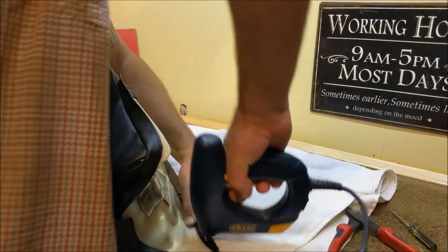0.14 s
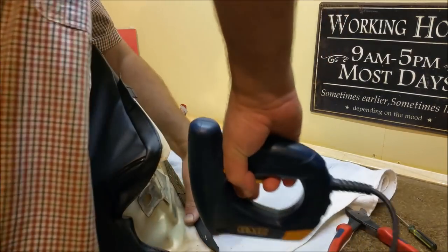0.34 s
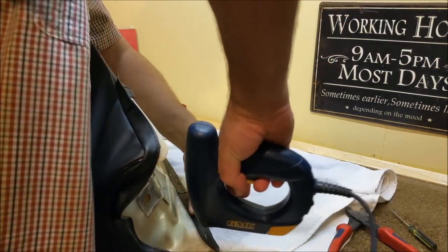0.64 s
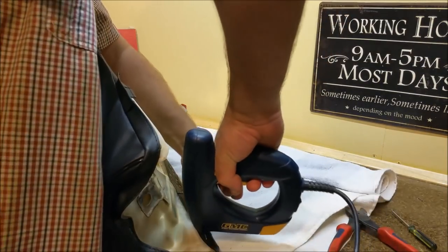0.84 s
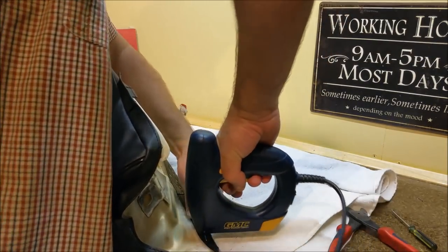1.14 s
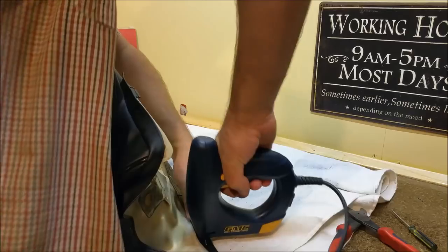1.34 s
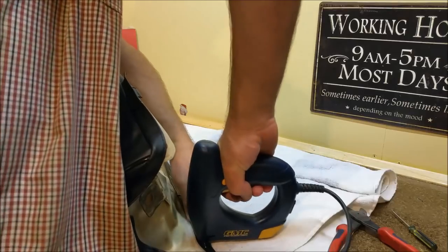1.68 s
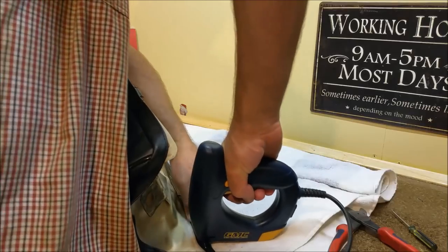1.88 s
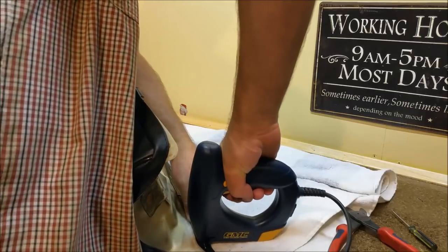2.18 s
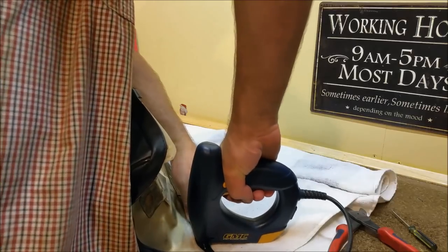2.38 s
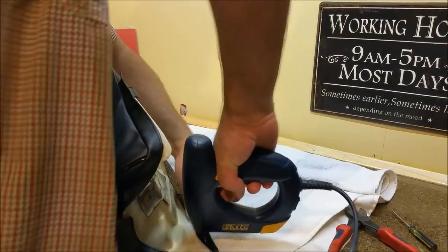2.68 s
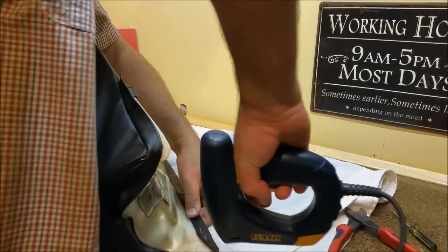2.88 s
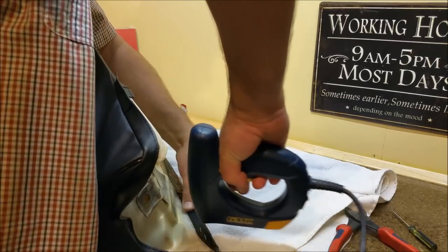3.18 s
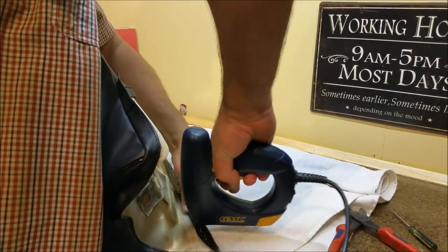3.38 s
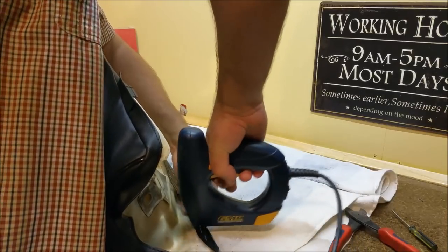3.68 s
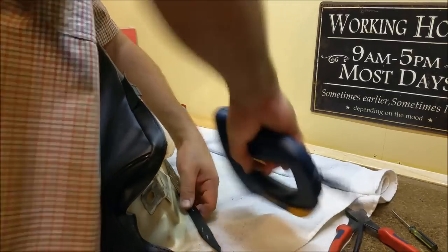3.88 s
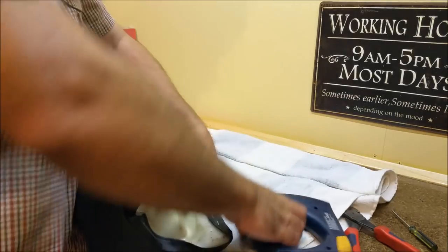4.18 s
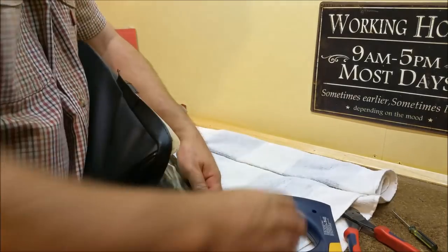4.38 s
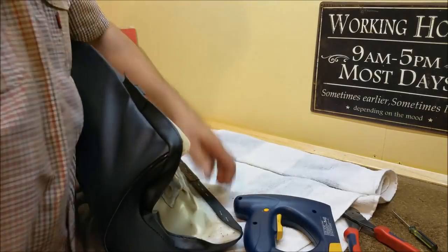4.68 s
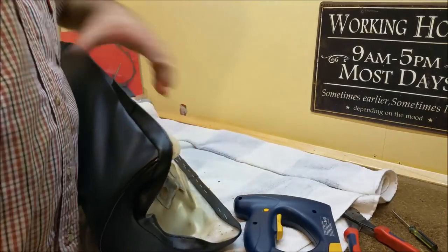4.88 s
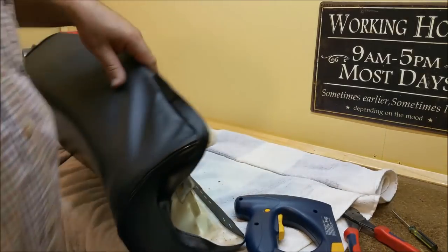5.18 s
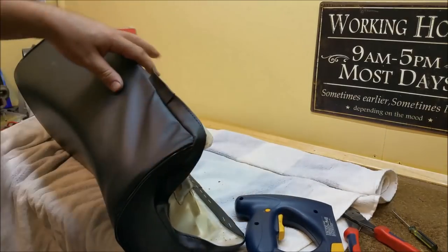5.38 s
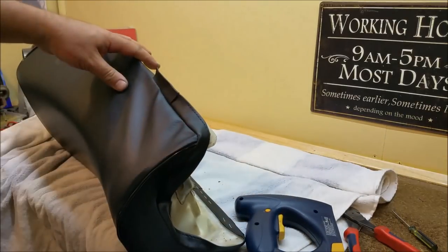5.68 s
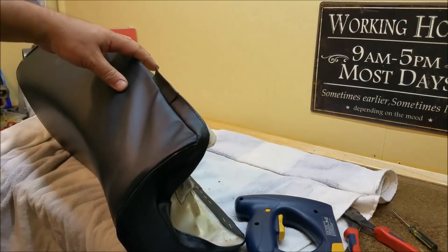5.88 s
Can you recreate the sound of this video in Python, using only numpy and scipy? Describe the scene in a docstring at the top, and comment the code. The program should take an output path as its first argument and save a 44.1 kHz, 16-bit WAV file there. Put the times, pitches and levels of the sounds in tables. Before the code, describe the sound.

A small workshop heard close up in stereo, with short room echo. Faint rumble, hiss and cloth rub open the scene; a thin, high cricket trill near 3.7 kHz, pulsing about 27 times a second in bouts with slower starts, is low at first and rises after 1.1 s. Stiff vinyl gives dry little snaps around 1.5 to 2.3 s with rustling. At 2.36 s an electric staple gun fires once: a very loud, hard burst of several blows within 20 ms, with housing ring and room tail. Trill and background drop from 2.5 s, recovering after 3.6 s. Around 4 s the tool brushes a towel, a crease cracks at 4.15, then ticks, hollow clacks and low thumps tumble from 4.19 to 4.45 s. Seat rumble and rustle follow, a soft pat at 5.1 s, light creases near 5.7 s, and a faint low hum grows under the trill until 6 s.

```python
"""First the rustle of vinyl and shirt as a padded seat is handled, over a faint workshop background.
A thin high trill, most likely a cricket, sings in bouts of falling notes, smeared by the room.
An electric staple gun fires once into the vinyl: a burst of blows makes its housing and the room ring.
It is laid on the padded bench and rocks to rest in ticks, clacks and thumps; later a hand pats the seat.
Trill and background start low, come up, and dip again for about a second after the shot."""
import sys
import numpy as np
from scipy import signal
from scipy.fft import rfft, irfft, next_fast_len
from scipy.io import wavfile
from scipy.ndimage import uniform_filter1d

SR = 44100
rng = np.random.default_rng(int(sys.argv[2]) if len(sys.argv) > 2 else 0)


def wrap_up_sound(samples):
    """Save the sound to the file named by the first command line argument, as 16-bit audio."""
    columns = np.atleast_2d(samples).T
    # keep every value between -1 and 1, then stretch to whole-number steps
    tamed = np.clip(columns, -1, 1)
    steps = np.round(tamed * 32767).astype(np.int16)
    wavfile.write(sys.argv[1], SR, steps)


N = 266792
T = np.arange(N) / SR  # time of every sample [s]


def undb(db):
    """Turn decibels into a plain gain."""
    return 10 ** (np.asarray(db) / 20)


def unit(x):
    """Scale a sound to an rms of 1."""
    return x / np.sqrt(np.mean(x ** 2))


def over_pitch(hz, points):
    """Read values off a curve of (frequency [Hz], value) points, on a log-frequency axis."""
    f, value = np.transpose(points)
    return np.interp(np.log(hz + 1), np.log(f), value)


def colour(x, points):
    """Give a sound the tone of a (frequency [Hz], level [dB]) curve, by a filter of unit power."""
    size = next_fast_len(N + SR // 2, True)
    size += size % 2
    gains = unit(undb(over_pitch(np.fft.rfftfreq(size, 1 / SR), points)))
    # folding the cepstrum forward makes the filter respond only after its input
    cepstrum = irfft(np.log(gains))
    cepstrum[1:size // 2] *= 2
    cepstrum[size // 2 + 1:] = 0
    response = np.exp(rfft(cepstrum))
    return irfft(rfft(x, size) * response)[..., :N]


def noise(side_db):
    """Stereo noise; side_db sets the left-right difference against the shared part."""
    mid, side = rng.standard_normal((2, N))
    return unit(mid + undb(side_db) * side * np.array([[1], [-1]]))


def walk(rate):
    """A smooth random wander with an rms of 1, given about rate new values per second."""
    k = int(SR / rate)
    steps = np.repeat(rng.standard_normal(N // k + 1), k)
    return unit(uniform_filter1d(steps, k)[:N])


def fade(start, length):
    """A sudden onset that falls to 1/e in length seconds."""
    return (T >= start) * np.exp(-np.clip((T - start) / length, 0, 60))


def swell(peak, rise, fall):
    """A smooth push that builds to a peak, then dies away."""
    before, after = ((T - peak) / rise) ** 2 / 2, (T - peak) / fall
    return np.exp(-np.where(T < peak, before, after).clip(0, 60))


def add(track, start, sound):
    """Mix a short sound into a track."""
    i = int(start * SR)
    track[..., i:i + sound.shape[-1]] += sound[..., :N - i]


def narrow(x, side_db):
    """Change the level of the difference between the channels."""
    mid = x.mean(axis=0)
    return mid + undb(side_db) * (x - mid)


# how long the workshop echoes before any stretch: (frequency [Hz], time to fall 60 dB [s])
ROOM_DECAY = [(60, 0.45), (300, 0.43), (900, 0.25), (2700, 0.33), (6000, 0.24), (14000, 0.16)]


def room(x, gap=0.006, stretch=0.98):
    """Diffuse echo of unit power: noise that starts after gap seconds, each octave dying at its own rate."""
    t = T[:int(.7 * SR)]
    spectrum = rfft(rng.standard_normal((2, len(t))))
    f = np.fft.rfftfreq(len(t), 1 / SR)
    tail = 0
    for hz in np.geomspace(32, 16384, 10):
        octave = np.clip(1 - abs(np.log2((f + 1) / hz)), 0, 1)
        band = irfft(spectrum * octave, len(t))
        t60 = stretch * over_pitch(hz, ROOM_DECAY)
        tail = tail + band * np.exp(-np.log(1000) * t / t60)
    tail = unit(tail * (t > gap)) / np.sqrt(len(t))
    return signal.fftconvolve(np.atleast_2d(x), tail, axes=1)[:, :N]


# tone of the low rumble: (frequency [Hz], relative level per Hz [dB])
RUMBLE_TONE = [(12, -37), (20, -10.5), (49, 3.5), (75, -0.5), (165, -0.5), (206, -3.5), (241, -2),
               (361, -10), (450, -15.5), (580, -38.5), (990, -120)]
# tone of rubbing cloth and of the dull wash: (frequency [Hz], relative level per Hz [dB])
RUB_TONE = [(200, -15), (450, 5), (800, -2.5), (1500, -6), (2600, -10.5), (4000, -11.5), (7000, -34.5)]
# tone of hiss, also used for crisp snaps: (frequency [Hz], relative level per Hz [dB])
HISS_TONE = [(1500, -10), (3000, 1), (4800, 2), (7000, -7.5), (10000, -4.5), (15000, -10)]
# steady background levels before the dips [dB]
RUMBLE_DB, WASH_DB, HISS_DB = -60, -67, -65.5
# the hum: starting pitch and level, then how much it grows [dB], from when [s] and over how long [s]
HUM_HZ, HUM_DB, HUM_GROWTH_DB, HUM_GROWS_S, HUM_GROWTH_S = 219, -72.5, 12, 4.53, 1.08


def workshop():
    """Steady filtered noise gives rumble, wash and hiss; a slightly wavering sine hums and grows late on."""
    growth = np.clip((T - HUM_GROWS_S) / HUM_GROWTH_S, 0, 1)
    hum_db = HUM_DB + HUM_GROWTH_DB * growth + 1.5 * walk(rate=3)
    hum_phase = 2 * np.pi * np.cumsum(HUM_HZ + 3 * walk(24)) / SR
    hum = np.sqrt(2) * np.sin(hum_phase) * undb(hum_db)
    rumble = undb(RUMBLE_DB) * colour(noise(side_db=-12.5), RUMBLE_TONE)
    wash = undb(WASH_DB) * colour(noise(side_db=-1.5), RUB_TONE)
    hiss = undb(HISS_DB) * colour(noise(side_db=2.5), HISS_TONE)
    return hum + rumble + wash + hiss


# when trill and background drop: (start [s], end [s], recovery to 1/e [s])
DIPS = [(-1, 1.056, 0.27), (2.5, 3.585, 0.23)]
DIP_DB = -15


def dips():
    """Level of the trill and background: a sudden drop, a hold and a gradual return."""
    depth = sum((T >= start) * np.exp(-np.maximum(T - end, 0) / recovery) for start, end, recovery in DIPS)
    return undb(DIP_DB * depth)


# tone of the steady workshop air: (frequency [Hz], relative level per Hz [dB])
AIR_TONE = [(20, -22.5), (33, -16), (50, 5.5), (110, -4.5), (250, -14.5), (500, -21.5), (1000, -20.5),
            (3000, -29.5), (6000, -33.5), (15000, -34)]
AIR_DB = -77


def air():
    """Faint, even noise of the workshop air."""
    return undb(AIR_DB) * colour(noise(side_db=-10.5), AIR_TONE)


# hand movements on the seat:
# (peak [s], rise [s], fall [s], rubbing level [dB], hiss level [dB], rumble level [dB])
MOVES = [(0.039, 0.19, 0.03, -56.5, -79.5, -55.5), (.2, 0.28, 0.23, -69, -86, -64.5),
         (1.1, 0.1, 0.2, -70, -96, -78.5), (1.54, 0.14, 0.39, -61, -66.5, -63),
         (2.64, 0.038, 0.19, -64, -79, -60), (3.1, 0.059, 0.41, -75.5, -97, -102),
         (4.53, 0.3, 0.3, -59, -66, -50), (5.02, .25, 0.11, -73.5, -65, -84),
         (5.62, 0.32, 0.42, -61, -60, -61.5)]
# the stapler brushing over the towel: (peak [s], rise [s], fall [s], level [dB])
BRUSHES = [(3.992, 0.021, 0.083, -53.5), (4.11, 0.02, 0.06, -54.5)]


def handling():
    """Cloth rubs in tiny slips and the seat rumbles on the bench; the stapler brushes the towel."""
    rub, hiss, rumble = sum(undb(levels)[:, None] * swell(peak, rise, fall)
                            for peak, rise, fall, *levels in MOVES)
    brush = sum(undb(db) * swell(peak, rise, fall) for peak, rise, fall, db in BRUSHES)
    # slow and fast wanders in level make the slips uneven
    slips = unit(undb(2 * walk(40) + 1.1 * walk(600)))
    # (frequency [Hz], relative level per Hz [dB])
    towel_tone = [(150, -15), (450, -3.0), (800, -8.5), (1550, 0.5), (2200, -18), (6000, -28.5)]
    towel = colour(noise(side_db=-2.5), towel_tone)
    return (rumble * colour(noise(side_db=-12.5), RUMBLE_TONE)
            + rub * colour(slips * noise(side_db=-1.5), RUB_TONE)
            + hiss * colour(slips * noise(side_db=-0.5), HISS_TONE)
            + brush * towel)


# bouts of trilling: (start [s], end [s])
BOUTS = [(-.3, .05), (.298, .40), (.598, 1.14), (1.308, 3.35), (3.54, 5.71), (5.85, 6.1)]
# wing strokes are slow and louder while a bout warms up, then fast; rates are averages per second
WARM_UP_S, WARM_UP_DB, SLOW_PER_S, FAST_PER_S = .21, 2, 16, 26.75
# one wing stroke: its force rises, holds and dies [s]
STROKE_ATTACK_S, STROKE_HOLD_S, STROKE_RELEASE_S = .007, .008, .017
# its pitch holds, then sags at an average speed down to an average limit
SAG_AFTER_S, SAG_HZ_PER_S, SAG_LIMIT_HZ = .012, 30000, 350
TRILL_DB, TRILL_ECHO_DB = -38.5, -5  # whole trill before the dips; echo against the direct song


def cricket(top_hz=3745, flutter_hz=26):
    """Each wing stroke sings a falling note; slow first strokes lead into a settled trill."""
    age, warming = np.ones(N), np.zeros(N)  # age: seconds since the stroke began; 1 is silent
    for start, end in BOUTS:
        on = (T >= start) & (T < end)
        warming[on] = T[on] - start < WARM_UP_S
        rate = np.where(warming[on], SLOW_PER_S, FAST_PER_S) * (1 + .01 * walk(30)[on])
        age[on] = np.cumsum(rate) / SR % 1 / rate
    corners = np.cumsum([0, STROKE_ATTACK_S, STROKE_HOLD_S, STROKE_RELEASE_S])
    force = np.interp(age, corners, [0, 1, 1, 0])
    push = uniform_filter1d(force, size=40) * undb(1.6 * walk(30) + WARM_UP_DB * warming)
    # the wing's scraper slows late in each stroke, by a randomly varying amount
    sag = np.clip(SAG_HZ_PER_S * (age - SAG_AFTER_S), 0, SAG_LIMIT_HZ) * (1 + 0.11 * walk(25))
    phase = 2 * np.pi * np.cumsum(top_hz - sag + flutter_hz * walk(250)) / SR
    overtones = (undb(-36) * np.sin(2 * phase) + undb(-33.5) * np.sin(3 * phase)
                 + undb(-35.5) * np.sin(4 * phase))
    # harder strokes sound brighter
    song = push * (np.sin(phase) + np.sqrt(abs(push)) * overtones)
    # the left channel gets it 5 samples later and slightly louder
    direct = np.array([undb(1) * np.roll(song, 5), song])
    echo = undb(TRILL_ECHO_DB) * room(song, gap=0.0046, stretch=1.1)
    return unit(direct + echo) * undb(TRILL_DB)


# vinyl creases snapping:
# (time [s], body level [dB], body pitch [Hz], relative treble level [dB])
CREASES = [(0.065, -49.5, 700, -74), (1.5137, -35, 2470, -41), (1.552, -48.5, 2300, -70),
           (1.607, -49, 2400, -72), (1.739, -36, 1830, -60), (1.793, -62, 1997, -46), (2.03, -41, 640, -75),
           (2.117, -48, 2200, -46), (2.206, -52, 2205, -47.5), (2.293, -47, 2433, -52.5),
           (4.065, -47, 1604, -46), (4.152, -34, 790, -46), (5.643, -49, 2340, -42),
           (5.739, -44, 2730, -61)]


def creases():
    """Folds of stiff vinyl give way with small dry snaps, each with a broad pitch of its own."""
    dry, grit = np.zeros((2, N)), noise(side_db=-4.5)
    for start, db, hz, _ in CREASES:
        band = signal.butter(2, [hz / 1.7, hz * 1.5], "bandpass", fs=SR)
        body = unit(signal.lfilter(*band, grit))
        dry += undb(db) * body * fade(start, 0.0027)
    crisp = sum(undb(db) * fade(start, 0.002) for start, _, _, db in CREASES)
    dry += undb(-5.0) * colour(crisp * noise(side_db=-1.5), HISS_TONE)
    return dry + undb(-10.0) * room(dry)


# blows inside the stapler:
# (time [s], relative level [dB], contact cut-off [Hz], fall to 1/e [s])
BLOWS = [(2.361, -15, 710, 0.0064), (2.3636, -2, 15900, 0.0058), (2.3668, -9, 2960, 0.0049),
         (2.374, 1.5, 1000, 0.0017), (2.3782, -6.5, 3500, 0.0015)]
# ringing of the stapler housing and driver:
# (frequency [Hz], relative level [dB], time to fall 60 dB [s])
GUN_MODES = [(146, -13, .25), (392, -3, .11), (428, -4, .15), (587, -3, .16), (763, 1, .2), (909, -5, .14),
             (1080, -7, .16), (1190, -3, .18), (1304, -1, .18), (1417, -4, .15), (1574, -3, .16),
             (1735, -4, .15), (2000, -8, .22), (2326, -9, .22), (2378, -5, .25), (2734, -12, .22),
             (3220, -11, .18), (4170, -11, .18), (4800, -12, .15)]
# tone of the snap: (frequency [Hz], relative level per Hz [dB])
SNAP_TONE = [(40, -21), (120, -5.5), (240, -10.5), (420, -2), (660, -8), (780, 0.5), (950, -7.5), (1400, 1),
             (2000, -7), (4000, -9.5), (5500, -14.5), (7500, -21.5), (12300, -17.5), (16000, -21)]
# tone sent into the snap's echo: (frequency [Hz], relative level per Hz [dB])
SNAP_ECHO_TONE = [(40, -34.5), (80, -21), (145, -11), (260, -7.5), (660, -3.5), (780, -5.5), (950, -7.5),
                  (1400, -2), (2400, -4.5), (3000, -10), (4800, -8.5), (6300, -13.5), (11500, -18),
                  (16000, -28.5)]
SNAP_DB, HOUSING_DB, RECOIL_DB, SNAP_ECHO_DB = 4.0, -24.5, -21, -7  # gains of the four parts


def staple_shot(recoil_hz=80, recoil_s=.0035):
    """The solenoid throws the driver, which strikes, rattles and springs back; housing and room ring."""
    force, strike = np.zeros((2, N)), BLOWS[1][0]
    for start, db, hz, length in BLOWS:
        soften = signal.butter(1, hz, fs=SR)  # softer contacts have less treble
        force += undb(db) * signal.lfilter(*soften, noise(side_db=1.0) * fade(start, length))
    t = T[:SR // 2]
    ring = 0
    for hz, db, t60 in GUN_MODES:
        # a random phase, slightly different in each channel
        phase = rng.uniform(0, 2 * np.pi) + rng.normal(0, 0.21, (2, 1))
        ring = ring + undb(db) * np.sin(2 * np.pi * hz * t + phase) * np.exp(-np.log(1000) * t / t60)
    housing = np.zeros((2, N))
    add(housing, strike, ring)
    # the recoil gives the padded seat one short shove
    lag = T - strike - .004
    recoil = np.sin(2 * np.pi * recoil_hz * lag) * np.exp(-(lag / recoil_s) ** 2 / 2)
    echo = narrow(room(colour(force, SNAP_ECHO_TONE), gap=0.0083), side_db=-1.5)
    return (undb(SNAP_DB) * colour(force, SNAP_TONE) + undb(HOUSING_DB) * housing
            + undb(RECOIL_DB) * recoil + undb(SNAP_ECHO_DB) * echo)


# knocks of the stapler on the bench; the last is a hand patting the seat:
# (time [s], clack level [dB], tick level [dB], shell level [dB], thump level [dB], thump pitch [Hz])
KNOCKS = [(3.36, -79, -82, -90, -57, 75.6), (4.188, -22, -11.5, -19, -33, 152),
          (4.208, -24, -26.5, -49, -33, 148), (4.243, -35, -43, -45, -22.5, 134),
          (4.264, -43, -64, -47, -25.5, 126), (4.279, -31, -28.5, -35, -23.5, 367),
          (4.305, -34, -54, -55, -37, 256), (4.336, -18.5, -24, -23, -53, 165),
          (4.380, -36, -29.5, -49, -26.5, 376), (4.4068, -25, -38, -24.5, -44, 250),
          (4.447, -33.5, -62, -36, -35, 172), (5.092, -37, -42, -70, -35, 197)]
# tone of the clack: (frequency [Hz], relative level per Hz [dB])
CLACK_TONE = [(47, -24), (80, -4), (156, 4.5), (269, -1), (486, 2), (649, -4), (919, -4), (1280, -6),
              (1540, -24), (1740, -15), (2180, -41), (3000, -49), (3900, -53), (6600, -120)]
# tone of the hard tick: (frequency [Hz], relative level per Hz [dB])
TICK_TONE = [(400, -20), (1000, 10), (1650, 13), (2600, 0.5), (6000, -7.5), (10000, -21.5), (16000, -14)]
# the stapler's hollow shell rings just after each knock
SHELL_HZ, SHELL_LAG_S = 640, 0.00653


def set_down_and_pat():
    """Plastic ticks, the shell clacks and rings, the bench thumps; a hand's pat on the seat ends the row."""
    clack, tick, thump = np.zeros((3, N))
    t = T[:SR // 4]
    rise = t / 0.0031
    bump = rise * np.exp(1 - rise)  # peaks at 1 after 3.1 ms
    for start, clack_db, tick_db, shell_db, thump_db, hz in KNOCKS:
        clack += undb(clack_db) * fade(start, 0.01)
        tick += undb(tick_db) * fade(start, 0.0035)
        add(thump, start, undb(thump_db) * bump * np.sin(2 * np.pi * hz * t))
        # for the pat this part is very faint
        add(thump, start + SHELL_LAG_S, undb(shell_db) * bump * np.sin(2 * np.pi * SHELL_HZ * t))
    body = colour(clack * noise(side_db=-11), CLACK_TONE) + thump
    ticks = colour(tick * noise(side_db=3), TICK_TONE)
    echo = room(undb(-10.5) * body + undb(-14) * ticks, gap=0.0119)
    return body + ticks + narrow(echo, side_db=-7)


def scene():
    """Work at the bench, with a trill and background that dip twice, and faint, even air noise."""
    background = dips() * (workshop() + cricket())
    return background + air() + handling() + creases() + staple_shot() + set_down_and_pat()


def record(dry):
    """Loud peaks such as the snap overload the recorder softly; it also cuts the top above 16 kHz."""
    top_cut = signal.ellip(8, .2, 70, 16000, fs=SR, output="sos")
    return signal.sosfilt(top_cut, np.tanh(dry))


dry = scene()
out = record(dry)
wrap_up_sound(out)
```